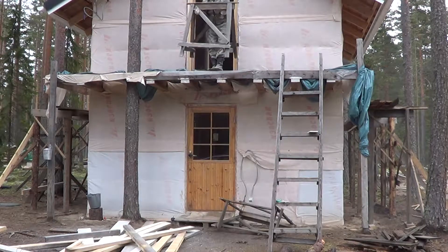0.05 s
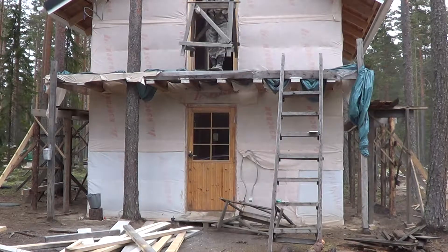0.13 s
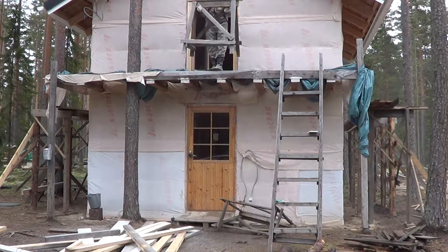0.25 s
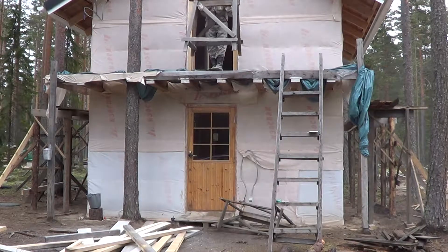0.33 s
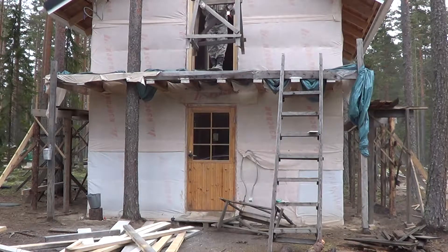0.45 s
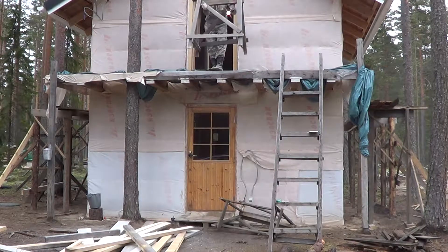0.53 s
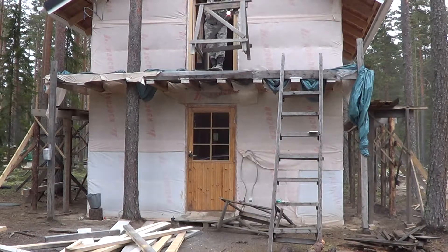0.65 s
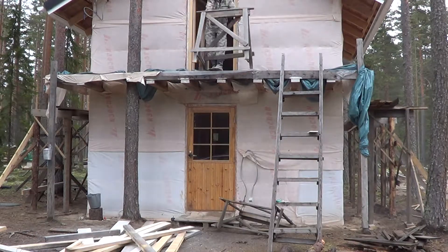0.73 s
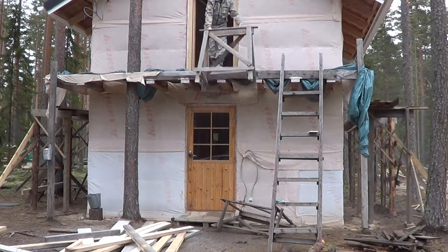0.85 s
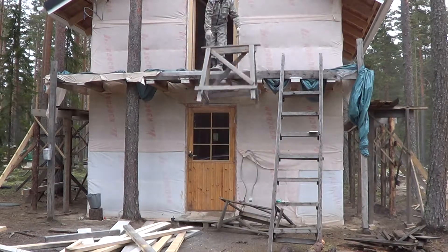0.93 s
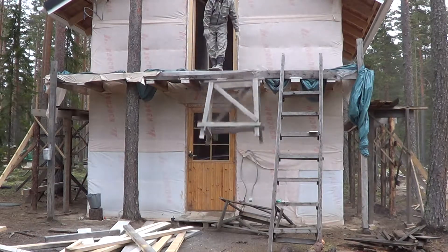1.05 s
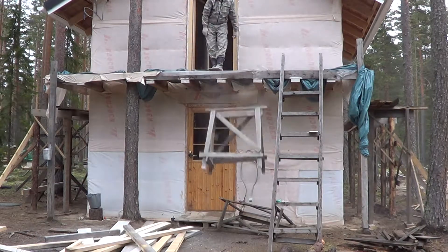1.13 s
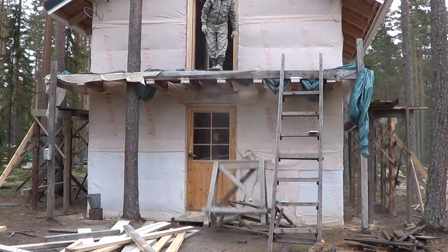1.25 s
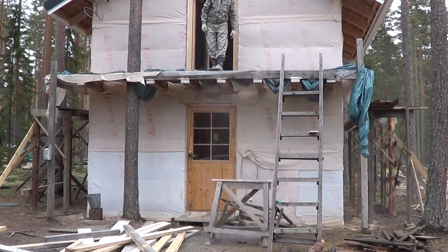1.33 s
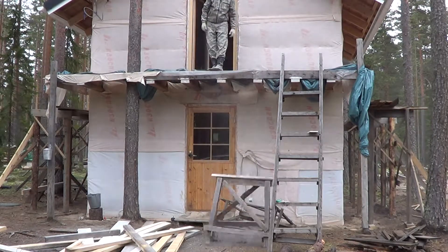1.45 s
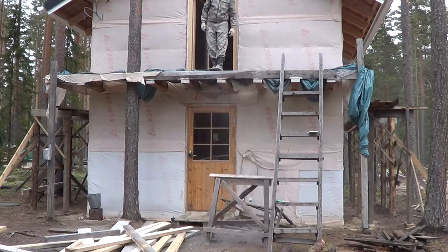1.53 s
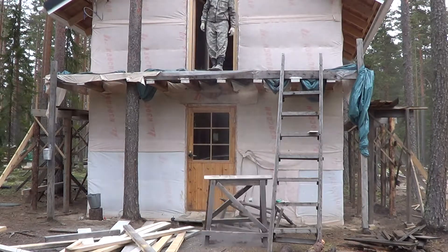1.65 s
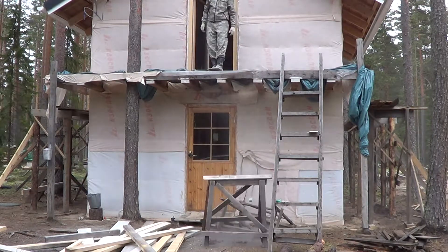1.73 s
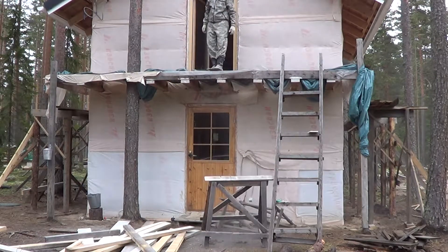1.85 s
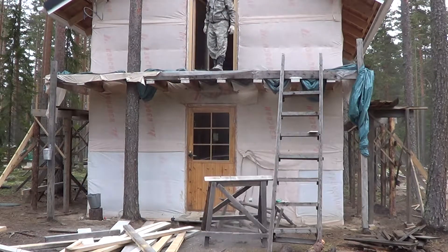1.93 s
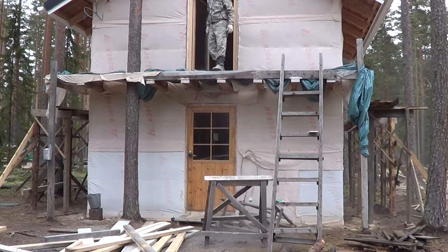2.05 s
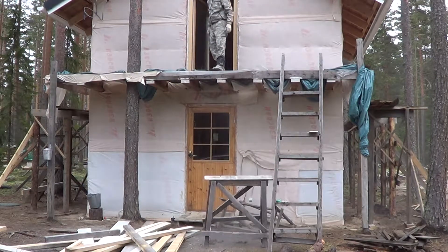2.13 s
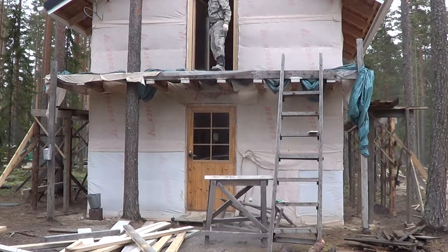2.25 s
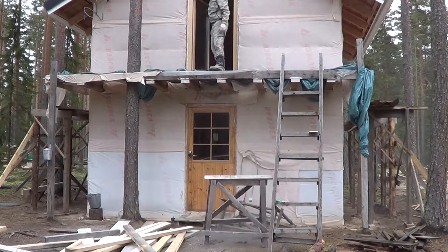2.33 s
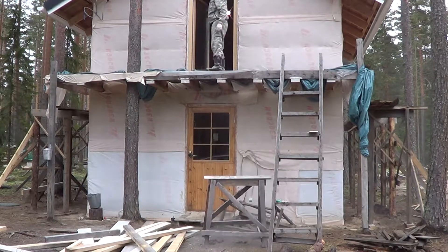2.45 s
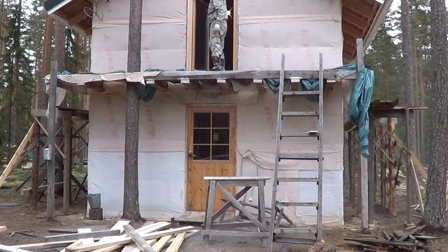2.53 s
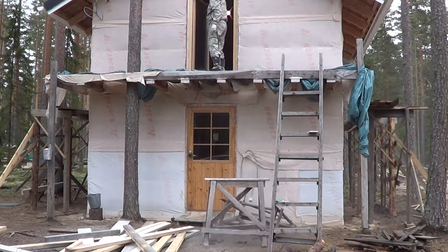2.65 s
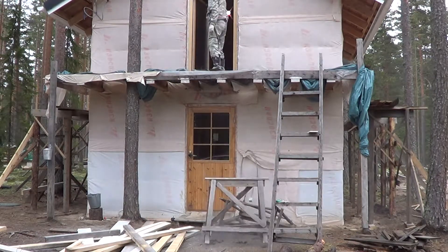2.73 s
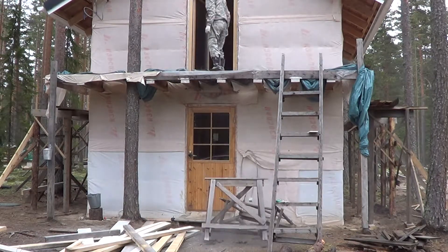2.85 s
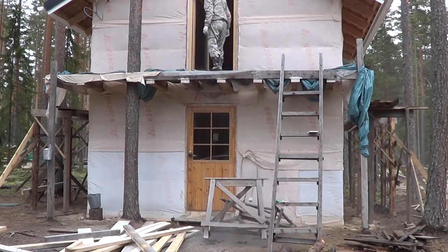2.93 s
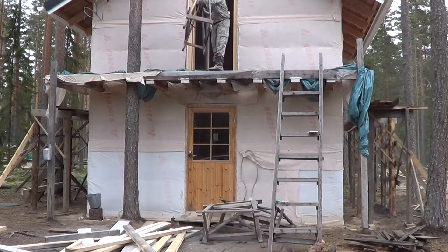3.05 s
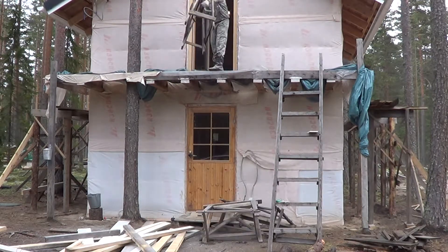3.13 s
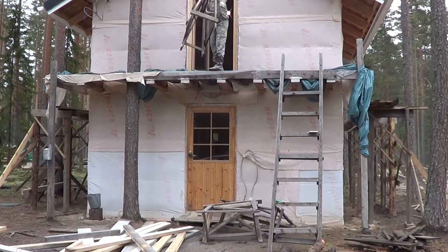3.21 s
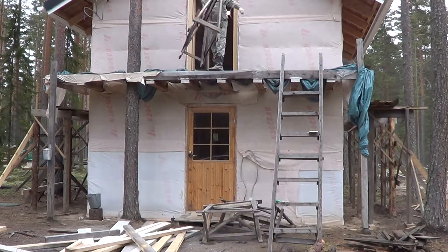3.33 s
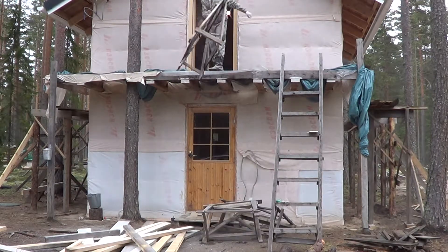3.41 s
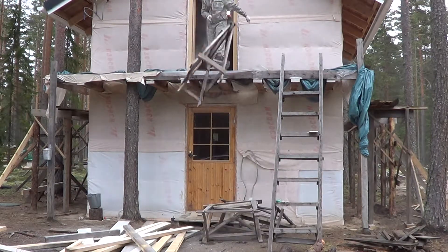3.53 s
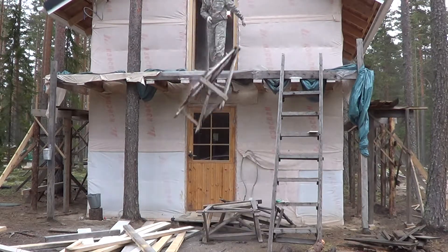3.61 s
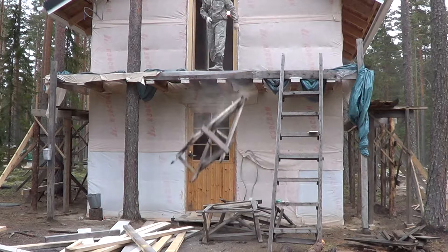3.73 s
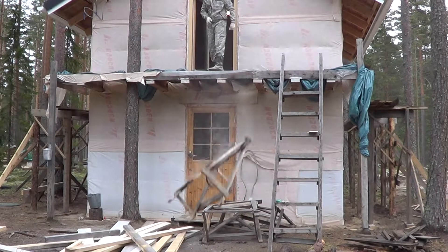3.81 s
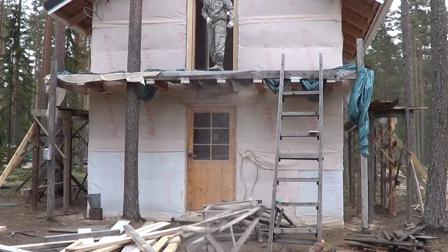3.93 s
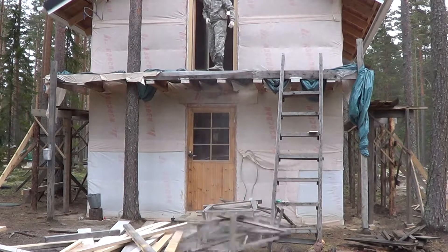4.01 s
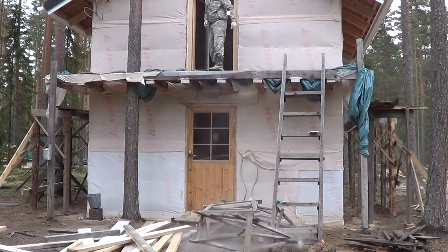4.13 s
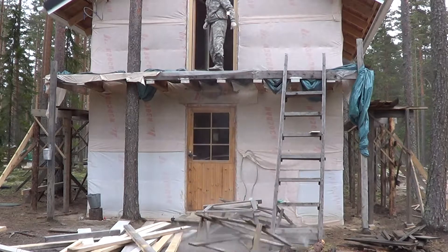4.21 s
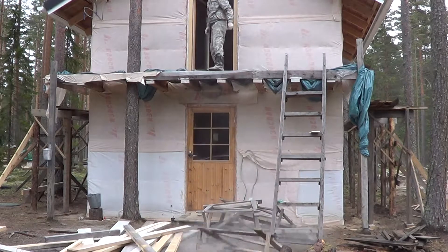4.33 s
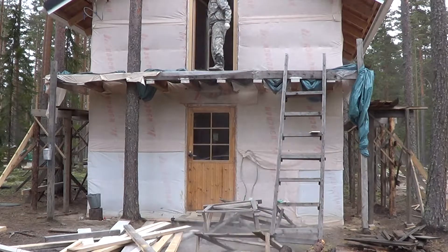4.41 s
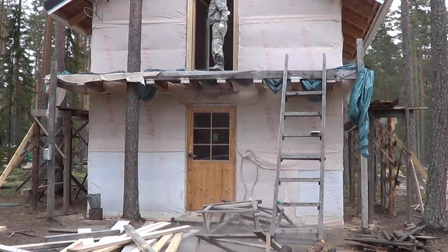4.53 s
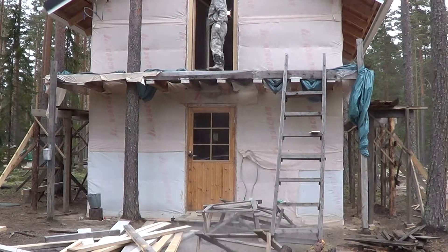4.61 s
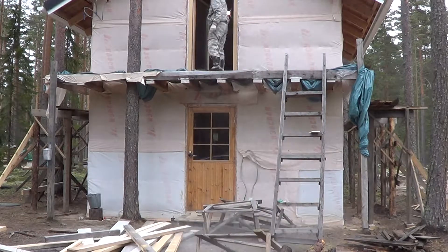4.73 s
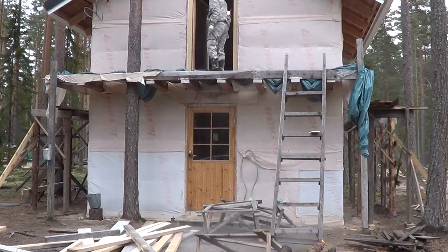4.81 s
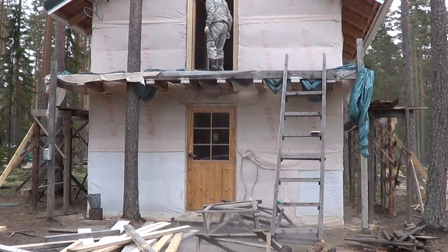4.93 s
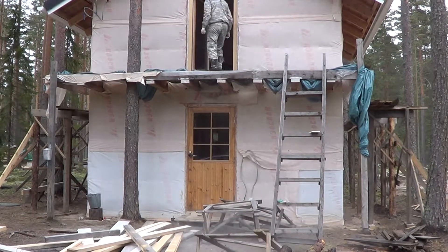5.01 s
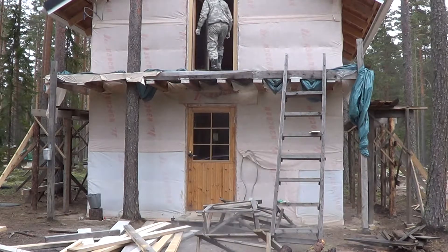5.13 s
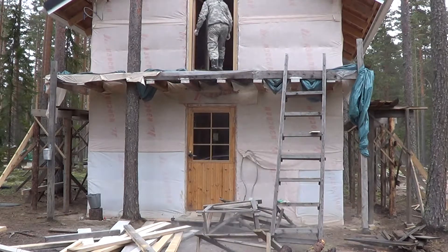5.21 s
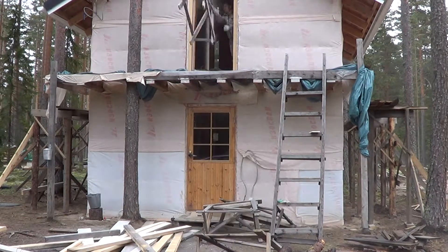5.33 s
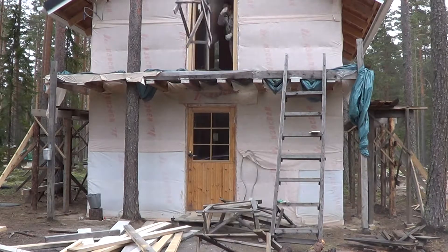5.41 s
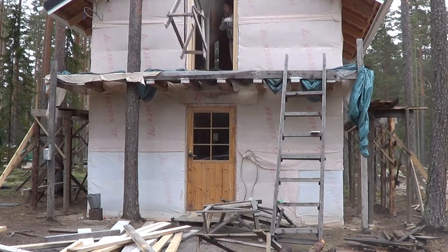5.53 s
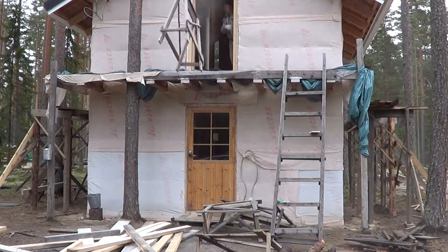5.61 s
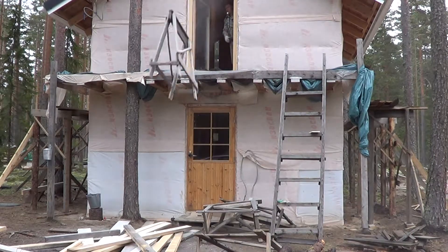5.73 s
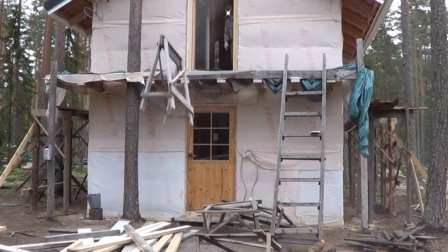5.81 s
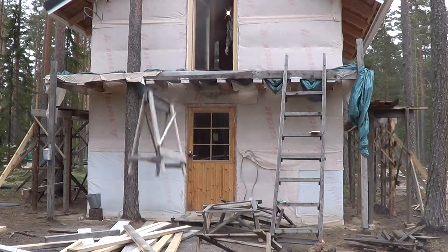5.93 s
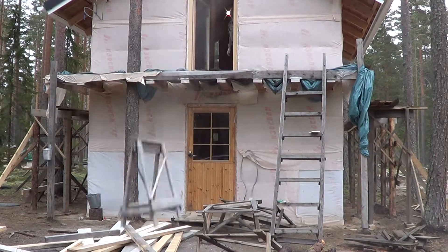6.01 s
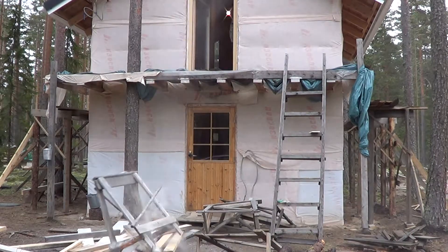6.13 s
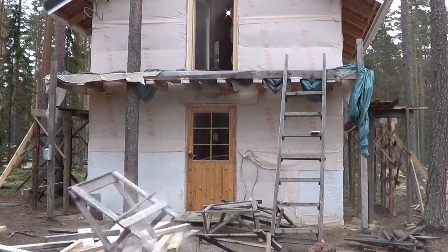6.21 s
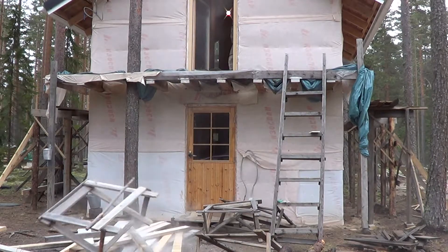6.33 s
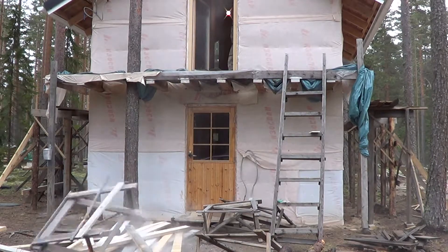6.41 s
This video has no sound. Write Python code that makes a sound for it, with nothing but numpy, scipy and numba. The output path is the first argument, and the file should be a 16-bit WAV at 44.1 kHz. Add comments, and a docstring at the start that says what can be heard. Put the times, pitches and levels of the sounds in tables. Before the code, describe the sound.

Wind soughs through pines while heavy wooden frames crash onto lumber three times, cracking and rattling, with splinters ticking and echoes among the trunks.

```python
"""Wind soughs in the crowns of a pine forest over a wavering low hum; timber scuffs, then wooden trestles
thrown from an upper doorway crash on a heap of timber, ten metres from a camcorder, and crash twice more later.
Each blow is a short clatter that rings the boards and cracks; nails squeak, splinters tick, the trunks echo.
From about 3 s a far motor drones for a while. The camcorder hisses and whines throughout."""
import sys
import numpy as np
from scipy import signal
from scipy.fft import rfft, irfft
from scipy.io import wavfile
from scipy.ndimage import uniform_filter1d
from numba import njit

SR = 44100
rng = np.random.default_rng(int(sys.argv[2]) if len(sys.argv) > 2 else 0)


def bounce(signal):
    """Save signal as a 16-bit WAV file at the path given by the first command-line argument."""
    frames = np.transpose(np.atleast_2d(signal))
    limited = np.clip(frames, -1, 1)
    pcm = np.round(limited * 32767).astype(np.int16)
    wavfile.write(sys.argv[1], SR, pcm)


N = 284886  # samples
SIDES = np.array([[1], [-1]])  # left, right


def undb(db):
    """Amplitude factor of a level in dB."""
    return 10 ** (np.asarray(db) / 20)


def level(x, db):
    """Scale x to an RMS level in dB."""
    return x * undb(db) / np.sqrt(np.mean(x ** 2))


def fall(t, t60):
    """Exponential decay by 60 dB in t60 seconds."""
    return np.exp(-np.log(1000) * t / t60)


def on_log(hz, table):
    """Read a table of (frequency [Hz], value) along a logarithmic frequency axis."""
    table_hz, values = np.transpose(table)
    return np.interp(np.log(np.maximum(hz, 1)), np.log(table_hz), values)


def colour(x, table):
    """Filter x by a gain curve of (frequency [Hz], gain [dB])."""
    hz = np.fft.rfftfreq(x.shape[-1], 1 / SR)
    return irfft(rfft(x) * undb(on_log(hz, table)), x.shape[-1])


def band(x, hz, q, order=1):
    """Band-pass around hz of relative sharpness q."""
    edge = np.sqrt(1 + 1 / (4 * q * q))
    edges = [hz * (edge - .5 / q), min(hz * (edge + .5 / q), .45 * SR)]
    return signal.sosfilt(signal.butter(order, edges, "bandpass", fs=SR, output="sos"), x)


@njit
def follow(x, attack, release):
    """Envelope with one smoothing share per sample for rises and another for falls."""
    y, e = np.empty(len(x)), 1e-6
    for i in range(len(x)):
        e += (x[i] - e) * (attack if x[i] > e else release)
        y[i] = e
    return y


def walk(rate):
    """Random levels held 1 / rate seconds and smoothed twice; spread near 1."""
    k = int(SR / rate)
    steps = np.repeat(rng.standard_normal(N // k + 1), k)
    return 0.517 * uniform_filter1d(uniform_filter1d(steps, k), k)[:N]


def add(out, x, s, db):
    """Place x at time s; db is the level of its loudest 4 ms."""
    i = int(s * SR)
    x = x[:N - i]
    loudest = np.sqrt(uniform_filter1d(x ** 2, size=176).max())
    out[i:i + len(x)] += x * undb(db) / loudest


def blows():
    """The clatter of each blow drives the frame, the struck piece, the crack and the slap of flat faces."""
    # single blows of wood on wood: (time [s], level of frame and piece [dB], pitch of the struck piece [Hz],
    # crack against that level [dB], clatter t60 [s])
    single_blows = [(1.345, -19, 900, 4, 0.04), (1.354, -19, 1640, 6.5, 0.087),
                    (1.365, -30.5, 950, 12.5, 0.084), (1.388, -30, 1060, 7.5, 0.31),
                    (1.418, -30, 1050, -22, 0.11), (1.63, -47.5, 1500, -2.5, 0.3),
                    (1.862, -36.5, 395, -5, 0.036), (1.879, -54, 275, 11, 0.17),
                    (2.667, -44.5, 724, -3, 0.27), (3.058, -51.5, 323, -1, 0.11),
                    (3.934, -46.5, 1290, 20, 0.32), (3.946, -11, 910, -1.5, 0.057),
                    (3.96, -13, 810, -9.5, 0.11), (3.973, -15.5, 784, 3.5, 0.091),
                    (3.998, -13, 409, -4, 0.14), (4.05, -12.5, 420, -18, 0.1),
                    (4.082, -16, 1850, -0.5, 0.17), (4.098, -16.5, 1680, -47, 0.23),
                    (4.135, -20, 400, -23, 0.16), (4.168, -14.5, 400, -30, .11),
                    (4.176, -24, 1020, -4, 0.27), (4.336, -32, 393, 3, 0.36),
                    (4.356, -18, 1190, -12, 0.063), (4.378, -23, 1060, -13, 0.15),
                    (4.423, -14.5, 1330, -4.5, 0.05), (4.444, -18, 1260, -7.5, 0.11),
                    (4.818, -56.5, 1080, 9.5, 0.2), (4.912, -46.5, 366, -14, .033),
                    (6.101, -19, 1970, 4, 0.5), (6.112, -9.5, 740, -21, 0.22), (6.206, -18, 790, -9, 0.11),
                    (6.226, -14.5, 302, -9, 0.21), (6.245, -14, 533, -41, 0.19),
                    (6.27, -9, 523, -21, 0.023), (6.361, -12, 820, -22, 0.18),
                    (6.375, -16, 804, -24, 0.048), (6.394, -17.5, 517, -14, 0.29)]
    slap_db, slap_per_crack = -8.5, 1  # dB against frame and piece, dB per dB of crack
    out, t = np.zeros(N), np.arange(SR // 4) / SR
    for s, db, hz, crack_db, t60 in single_blows + bounces():
        push = clatter(t, t60)
        piece = level(band(push, hz, 1.25, order=2), 0)
        add(out, frame_ring(push, t, hz) + piece, s, db)
        add(out, fibre_crack(push, t), s, db + crack_db)
        slap = band(push, 1444, 0.45, order=2)
        add(out, slap, s, db + slap_db + slap_per_crack * crack_db)
    return out


def bounces():
    """A loose board chatters: each rattle is a row of even bounces whose level and pitch slide."""
    # (start [s], length [s], gap [s], level of first bounce [dB], loss per bounce [dB], first pitch [Hz],
    # last pitch [Hz], crack [dB], clatter t60 [s]); a negative loss is a gain
    rattles = [(4.185, .09, .03, -13.5, 5.5, 396, 415, -39, 0.13),
               (6.13, .06, .02, -10, 1, 810, 500, -16, 0.24),
               (6.288, .032, .016, -14, -1, 780, 466, -36, .09)]
    rows = []
    for s, length, gap, db, loss_db, first_hz, last_hz, crack_db, t60 in rattles:
        k = np.arange(round(length / gap) + 1)
        hz = np.geomspace(first_hz, last_hz, len(k))
        rows += [(s + i * gap, db - i * loss_db, hz[i], crack_db, t60) for i in k]
    return rows


def clatter(t, t60):
    """A hard first contact and a fading rush of smaller ones: spiky noise."""
    rise_s = 0.0029
    spike = undb(1.74 * rng.exponential(size=len(t)))
    rush = rng.standard_normal(len(t)) * spike * fall(t, t60) * np.minimum(t / rise_s, 1)
    return rush * (1 + 0.88 * fall(t, 0.006))


def frame_ring(push, t, hz):
    """Damped modes of the whole trestle, driven hardest near the pitch hz of the struck piece."""
    # modes of the trestles: (frequency [Hz], width [Hz], strength [dB])
    timber_modes = [(218, 6.6, -4), (243, 10, -22.5), (284.5, 9, -2), (331.9, 11, -1.5), (415, 7.1, -3),
                    (564, 3.5, -7), (638, 64, -6), (702, 14, -12.5), (802, 76, -3), (835.5, 16.7, 1),
                    (903, 21, -4), (946, 24, -2.5), (1146, 71, 4), (1203, 25, -5), (1290, 51, -2),
                    (1600, 51, 2), (1640, 23, -6.5), (2000, 80, -16), (2025, 100, 8.5), (2300, 140, -17),
                    (2130, 110, -10), (2570, 130, -47)]
    frame_db, frame_db_per_octave = 0, 0.5  # at a struck piece of 500 Hz, and its rise with pitch
    mode_spread = .006  # share by which the modes shift with how the trestle lies
    mode_hz, width, mode_db = np.transpose(timber_modes)[:, :, None]
    scatter_db = 2.5 * rng.standard_normal(mode_hz.shape)  # each blow lands elsewhere
    shifted_hz = mode_hz * (1 + mode_spread * rng.standard_normal(mode_hz.shape))
    drive_db = mode_db - 16 * np.abs(np.log2(mode_hz / hz)) + scatter_db
    ringing = np.exp(-np.pi * width * t) * np.sin(2 * np.pi * shifted_hz * t)
    modes = np.sum(undb(drive_db) * ringing, axis=0)
    # later contacts reach the whole frame less
    frame = signal.fftconvolve(push * fall(t, 0.54), modes)[:len(t)]
    return level(frame, frame_db + frame_db_per_octave * np.log2(hz / 500))


def fibre_crack(push, t):
    """Fibres tear a little after the contact: the clatter with a slower rise, an added decay and its own colour."""
    # spectrum of tearing fibres: (frequency [Hz], gain [dB])
    crack_colour = [(120, -7), (400, -3), (1180, 0), (2000, -5.5), (2660, -13), (2970, -18.5), (4200, -8.5),
                    (5690, -7), (7450, -9.5), (10200, -10.5), (12800, -20.5), (15000, -28)]
    rise_s, t60_s = 0.0031, 0.49
    return colour(push * np.minimum(t / rise_s, 1) * fall(t, t60_s), crack_colour)


def thuds():
    """Timber meets the soil: a clatter that keeps only a low band."""
    # (time [s], level [dB])
    soil_blows = [(1.363, -30), (1.416, -33), (1.861, -36), (2.673, -43), (3.95, -28), (4, -30),
                  (4.134, -20.5), (4.187, -40), (4.444, -21.5), (6.115, -23), (6.188, -28), (6.243, -19),
                  (6.301, -38)]
    out, t = np.zeros(N), np.arange(SR // 4) / SR
    for s, db in soil_blows:
        add(out, band(clatter(t, 0.14), 160, 0.76, order=2), s, db)
    return out


def squeaks():
    """A nail slips in its joint at an even gap; each slip rings a narrow metal resonance for milliseconds."""
    # (first slip [s], mean level of first slip [dB], mean pitch [Hz], length [s], loss per slip [dB])
    nail_slips = [(1.353, -16.5, 5370, .036, -0.1), (1.394, -41, 5360, .15, 1.2), (1.645, -49, 4270, 0, 0),
                  (3.9804, -18, 5870, 0.0072, 5), (6.104, -23.5, 5420, 0.015, 0), (6.1133, -18, 4850, 0, 0),
                  (6.1324, -23, 5140, 0.0027, -3)]
    slip_gap_s, pitch_spread = .0117, .022  # spread as a share of the pitch
    out, t = np.zeros(N), np.arange(SR // 20) / SR
    swell = np.exp(-((t - .003) / .0018) ** 2)
    for s, db, nail_hz, length, loss_db in nail_slips:
        for k in range(round(length / slip_gap_s) + 1):
            hz = nail_hz * (1 + pitch_spread * rng.standard_normal())
            rasp = level(band(rng.standard_normal(len(t)), hz, 7, order=2), 0)
            tone = np.sin(2 * np.pi * hz * t) + .6 * rasp
            slip_db = db - k * loss_db + 2 * rng.standard_normal()
            add(out, tone * swell, s + k * slip_gap_s - .002, slip_db)
    return out


def grit():
    """Splinters land as ticks of a few cycles; scuffs are swells of many fine noise grains."""
    # splinters land: (time [s], level [dB], pitch [Hz])
    ticks = [(1.8946, -28.5, 7560), (1.9097, -36, 7700), (1.929, -43, 8350), (1.9733, -44.5, 8400),
             (4.148, -38, 9500), (4.488, -47, 8580), (4.5034, -42.5, 7100), (4.553, -44, 8450),
             (4.564, -40.5, 6800), (4.6, -43.5, 5880), (4.62, -48, 5770), (4.7485, -36, 5800),
             (4.763, -29.5, 6340), (4.7888, -45, 6910), (4.803, -40.5, 6200), (4.839, -55, 6760),
             (6.208, -35, 9000), (6.227, -27, 10500), (6.394, -30.5, 6880)]
    # timber scuffs along the door frame or sand trickles: (time [s], level [dB], rise and fall [s])
    scuffs = [(.68, -61, .05), (.73, -55, .014), (1.682, -52, 0.016), (1.719, -53.5, 0.017),
              (1.91, -50, .03), (2.68, -73, .015), (3.15, -57, .024), (4.58, -52.5, 0.047),
              (4.668, -53.5, 0.019), (5.35, -60, .03), (6.43, -40.5, 0.028)]
    out, t = np.zeros(N), np.arange(SR // 50) / SR
    for s, db, hz in ticks:
        scrape = 2.0 * rng.standard_normal(len(t)) * fall(t, 0.0055)
        add(out, band((t == 0) + scrape, hz, 2.4, order=2), s, db)  # a click and a scrape
    now = np.arange(N) / SR
    swell = sum(undb(db) * np.exp(-((now - s) / length) ** 2) for s, db, length in scuffs)
    grains = rng.standard_normal(N) * undb(2.17 * rng.exponential(size=N))
    return out + swell * level(band(grains, 5800, 0.8, order=2), 0)


def forest(x):
    """Scattering from trunks and the house wall: noise that fades band by band."""
    # decay of the forest: (frequency [Hz], t60 [s])
    decay = [(100, 0.58), (300, 0.33), (1000, 0.53), (2500, 1), (6000, 0.12), (14000, 0.54)]
    # tone of the echo: (frequency [Hz], gain [dB])
    tone = [(100, 8.5), (400, 2), (1200, -1), (3500, 1.5), (7000, 2), (14000, -0.5)]
    # width of the echo: (frequency [Hz], side minus mid [dB])
    width = [(100, -30), (600, -7.5), (2500, -4), (8000, -8.5), (14000, -59)]
    echo_db = -10
    t = np.arange(SR) / SR
    mid, side = rng.standard_normal((2, SR))
    pair = mid + colour(side, width) * SIDES
    centres = 60 * 2 ** np.arange(0, 8.1, .5)
    t60 = on_log(centres, decay)
    tail = sum(band(pair, hz, 1.6) * fall(t, d) / np.sqrt(d) for hz, d in zip(centres, t60))
    tail = colour(tail, tone) * np.minimum(t / 0.0022, 1)
    tail = tail * undb(echo_db) / np.sqrt(np.sum(tail ** 2) / 2)
    return signal.fftconvolve(x[None], tail, axes=1)[:, :N]


def ports(x):
    """The two microphone ports differ: the left one is weaker in the bass and the right one leads in phase, so
    the channels differ in level and phase, most at low pitches."""
    # (frequency [Hz], left minus right [dB])
    port_db = [(60, -4.5), (110, -2.5), (200, -2), (380, -2.0), (700, -1.5), (1290, -1.5), (2380, 0.5),
               (4400, 0.0), (8120, 0.3), (15000, 0)]
    # (frequency [Hz], left ahead of right [radians])
    port_lead = [(0, -.5), (150, -.9), (260, -.85), (1400, -.2), (3500, 0)]
    hz = np.fft.rfftfreq(N, 1 / SR)
    lead = np.interp(hz, *np.transpose(port_lead))
    gain = undb(SIDES / 2 * on_log(hz, port_db))  # half the difference to each port
    return irfft(rfft(x) * gain * np.exp(1j * SIDES / 2 * lead), N)


def motor():
    """A far drone: only some high multiples of the turn rate carry, each wavering in the air."""
    # (time [s], mean turn rate [Hz], level [dB])
    course = [(3.02, 185, -94), (3.06, 187, -66.5), (3.9, 187.1, -65), (4.9, 188, -64.5),
              (5.299, 180, -64.5), (5.45, 184.6, -92)]
    # (multiple of the turn rate, relative mean strength [dB])
    orders = [(7, -3), (10, -2), (11, -3), (12, -2), (13, -3), (16, -1), (17, 0), (18, -5), (19, -4),
              (21, -6)]
    now, (s, hz, db) = np.arange(N) / SR, np.transpose(course)
    turn_hz = np.interp(now, s, hz) * (1 + 0.00289 * walk(44))
    turn = 2 * np.pi * np.cumsum(turn_hz) / SR
    drone = sum(undb(g + 2.8 * walk(24)) * np.sin(k * turn + 2 * np.pi * rng.random()) for k, g in orders)
    return level(drone, 0) * undb(np.interp(now, s, db))


def wind():
    """Sough in the crowns and rustle of needles: wide noises that follow the gusts and flicker a little."""
    # spectrum of the sough: (frequency [Hz], gain [dB])
    sough_colour = [(12, -30), (20, -4.5), (54, -9), (71, -14), (88, -11), (156, -7.5), (193, -5.5),
                    (228, -7.5), (593, -3), (789, -3), (2730, -21), (6000, -71), (7800, -47), (13200, -120)]
    # gusts: (time [s], mean sough level [dB], mean needle rustle level [dB])
    gusts = [(0, -54.5, -61.5), (1.3, -54, -60.5), (2.1, -53, -59), (2.95, -54, -61.5), (3.1, -52, -56.5),
             (3.9, -53, -57), (4.9, -51.5, -54), (5.4, -52.5, -60), (6.46, -51, -60)]
    now, (s, sough_db, rustle_db) = np.arange(N) / SR, np.transpose(gusts)
    mid, side = colour(rng.standard_normal((2, N)), sough_colour)
    sough = level(mid + 0.38 * side * SIDES, 0) * undb(np.interp(now, s, sough_db) + 0.75 * walk(5))
    mid, side = band(rng.standard_normal((2, N)), 1860, 0.37, order=2)
    rustle = level(mid + 1.01 * side * SIDES, 0) * undb(np.interp(now, s, rustle_db) + 0.37 * walk(10))
    return sough + rustle


def hum():
    """A far hum: a narrow band of noise at 60.7 Hz whose level wavers."""
    # (time [s], level [dB])
    hum_course = [(0, -62), (.45, -60), (1.1, -66), (2, -60), (3, -68), (3.8, -62.5), (5, -62.5),
                  (6.46, -68)]
    hum_db = np.interp(np.arange(N) / SR, *np.transpose(hum_course))
    return level(band(rng.standard_normal(N), 60.7, 4.5), 0) * undb(hum_db)


def scene():
    """Timber with its echo, heard through the two ports, then the drone, wind and hum of the forest."""
    wood = blows() + thuds() + squeaks()
    # boards are small against bass waves and radiate them poorly
    wood = signal.sosfilt(signal.butter(2, 94.6, "highpass", fs=SR, output="sos"), wood)
    timber = ports(wood + forest(wood) + grit())
    air = (wind() + hum()) * undb(-.6 * SIDES)  # a little stronger on the right
    return timber + air + motor()


def record(dry):
    """The camcorder holds loud sound down, rounds peaks, adds hiss and a line-scan whine, and cuts the top."""
    limit_db, limit_ratio, attack_s, release_s = -8, 1.47, 0.006, 0.02
    whine_hz, whine_db, hiss_db, top_hz = 15625, -57, -64, 15750
    field_hz, gap_length, gap_at = 50, .25, 0.9  # the whine dips once a field; shares of a field
    now = np.arange(N) / SR
    from_gap = np.abs((field_hz * now - gap_at + .5) % 1 - .5)
    whine_gate = np.clip((from_gap - gap_length / 2) / .06 + .6, .12, 1)
    whine = np.sqrt(2) * np.sin(2 * np.pi * whine_hz * now) * whine_gate
    hiss = level(band(rng.standard_normal(N), 8500, 0.93), hiss_db)
    loud = follow(np.abs(dry).max(axis=0), 1 / (attack_s * SR), 1 / (release_s * SR))
    held = dry * np.minimum(undb(limit_db) / loud, 1) ** (1 - 1 / limit_ratio)
    heard = np.tanh(1.26 * held) / 1.54 + undb(whine_db) * whine + hiss
    return signal.sosfilt(signal.ellip(10, .2, 80, top_hz, fs=SR, output="sos"), heard)


dry = scene()
out = record(dry)
bounce(out)
```